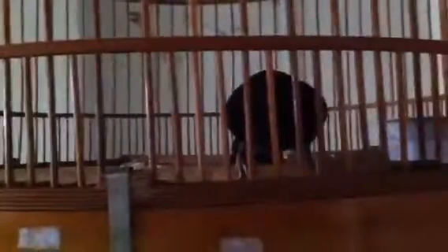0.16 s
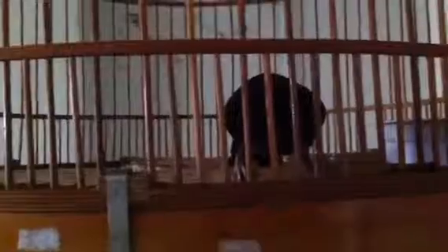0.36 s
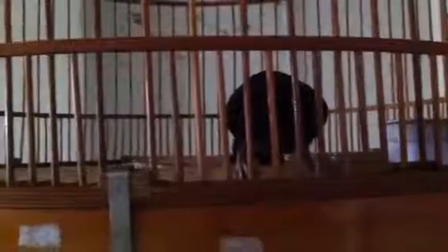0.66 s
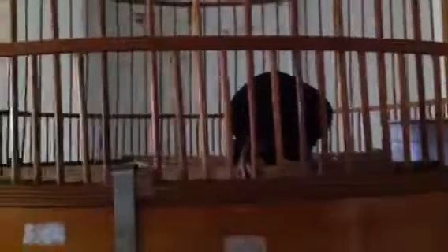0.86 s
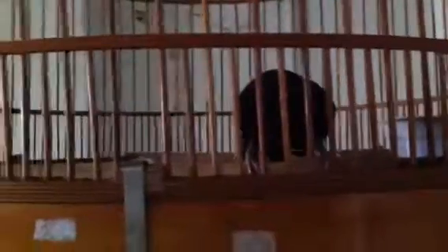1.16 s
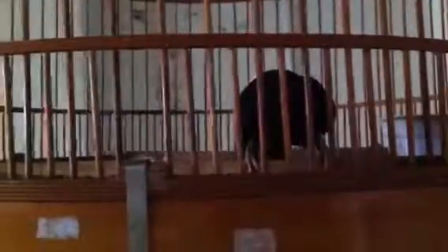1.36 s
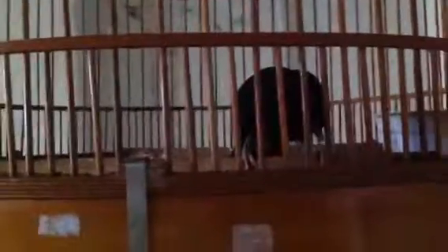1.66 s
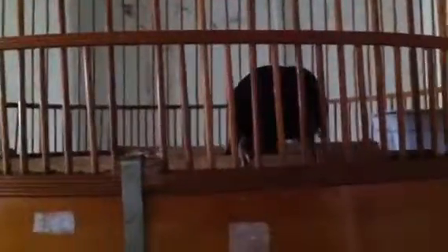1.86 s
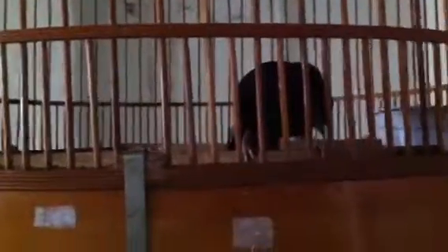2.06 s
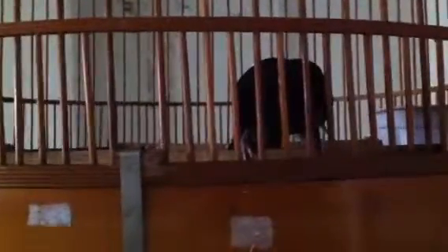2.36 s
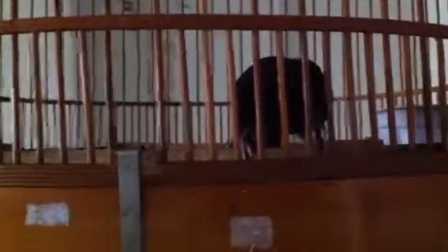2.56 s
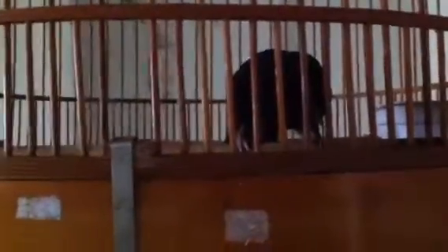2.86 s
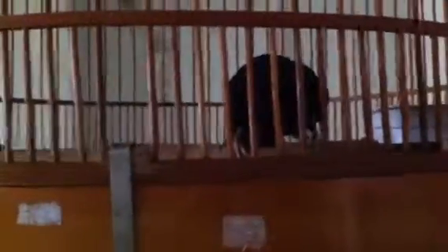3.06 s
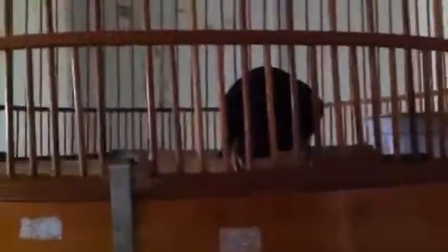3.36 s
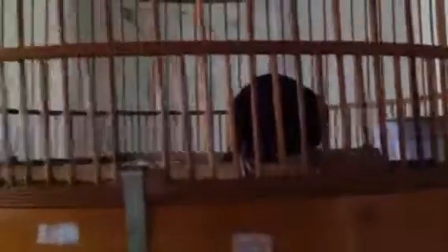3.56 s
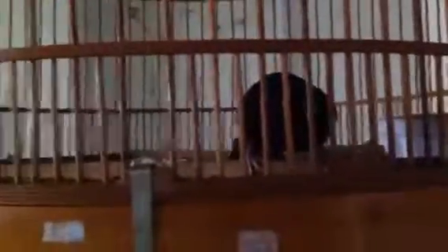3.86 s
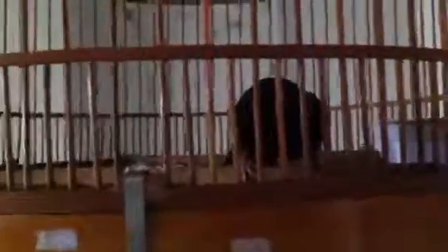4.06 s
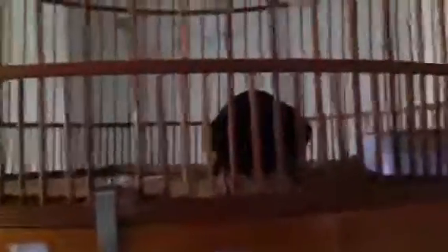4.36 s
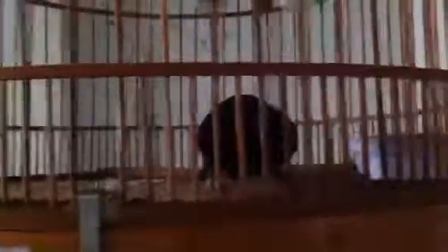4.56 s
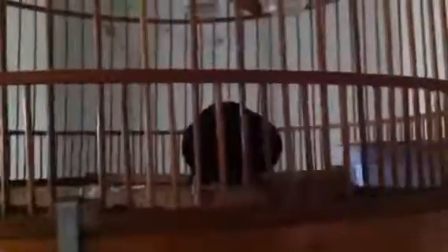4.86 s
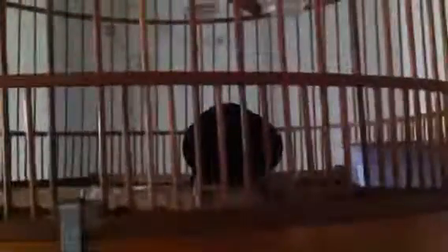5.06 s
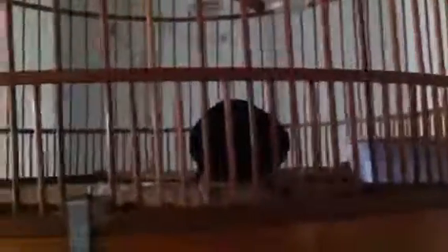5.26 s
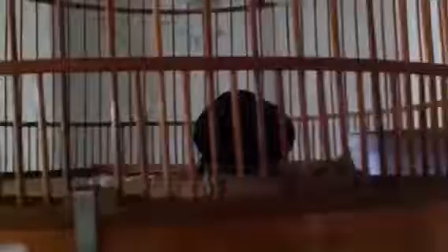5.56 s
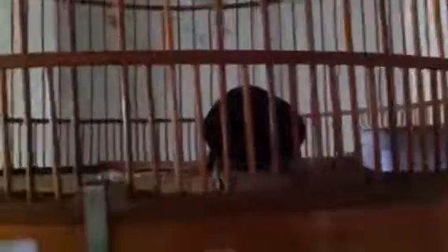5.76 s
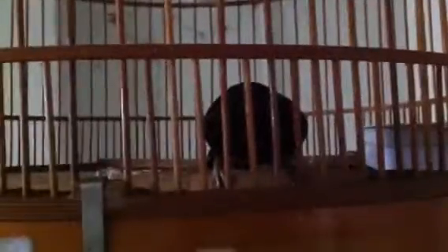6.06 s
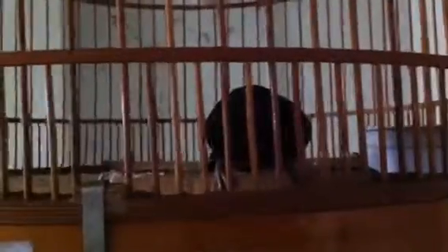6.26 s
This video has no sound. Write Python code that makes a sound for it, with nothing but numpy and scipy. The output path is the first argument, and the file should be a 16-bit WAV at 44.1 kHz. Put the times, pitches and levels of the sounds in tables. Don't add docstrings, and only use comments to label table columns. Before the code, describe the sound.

Near bird's rapid whistled song and piercing downward calls in an echoing room, with a distant bird's even whistles, brush strokes and faint motor hum.

```python
import sys
import numpy as np
from scipy import signal
from scipy.fft import rfft, irfft
from scipy.io import wavfile
from scipy.ndimage import uniform_filter1d

SR = 44100
rng = np.random.default_rng(int(sys.argv[2]) if len(sys.argv) > 2 else 0)


def makeup_ratio(level_db):
    decades = np.asarray(level_db, float) / 20
    return 10 ** decades


def bounce(signal):
    frames = np.transpose(np.atleast_2d(signal))
    limited = np.clip(frames, -1, 1)
    pcm = np.round(limited * 32767).astype(np.int16)
    wavfile.write(sys.argv[1], SR, pcm)


N = 282240
LEAD = SR // 5


def at_hz(points, hz):
    point_hz, point_db = np.transpose(points)
    return np.interp(np.log(hz), np.log(point_hz), point_db)


def coloured(x, spectrum):
    hz = np.maximum(np.arange(len(x) // 2 + 1) * SR / len(x), 1)
    y = irfft(rfft(x) * makeup_ratio(at_hz(spectrum, hz)), len(x))
    return y / np.std(y)


def drift(size, rate_hz):
    r = np.exp(-2 * np.pi * rate_hz / SR)
    noise = rng.standard_normal(size + 4000)
    slow = signal.lfilter([1], [1, -2 * r, r * r], noise)[4000:]
    return slow / np.std(slow)


def add(out, start_s, x):
    i = LEAD + round(start_s * SR)
    out[i:i + len(x)] += x[:len(out) - i]


def stroke(shape, s, length, from_hz, to_hz, db):
    return [(s + u * length, from_hz + way * (to_hz - from_hz), db + d) for u, way, d in shape]


# (frequency [Hz], time to fall 60 dB [s], level [dB])
ROOM_DECAY = [(513, 0.06, -11), (850, 0.48, 10), (1500, 0.49, 2.5), (3000, 0.34, 4), (6400, 0.4, 5.5),
              (11300, 0.32, 0.5)]


def echoes():
    gap_s = 0.0038
    t, tail = np.arange(SR) / SR, 0
    hz, t60, db = np.transpose(ROOM_DECAY)
    for low in 170 * 2 ** np.arange(0, 6.6, .5):
        half_octave = signal.butter(2, [low, low * np.sqrt(2)], "band", fs=SR, output="sos")
        band = signal.sosfilt(half_octave, rng.standard_normal(SR))
        middle = low * 2 ** .25
        life_s = np.interp(middle, hz, t60)
        tail = tail + band * makeup_ratio(np.interp(middle, hz, db) - 60 * t / life_s)
    tail = tail * np.clip(t / gap_s - 1, 0, 1)
    return tail / np.sqrt(np.sum(tail ** 2))


def room(x, tail):
    return signal.fftconvolve(x, tail)[:len(x)]


# (frequency [Hz], level [dB])
BREATH_COLOUR = [(3000, -19.5), (4000, -13), (8000, -5), (8900, -2), (12000, -7.5), (16000, -7.5)]
# (frequency [Hz], level [dB])
THROAT_COLOUR = [(1500, -6), (3000, 5.5), (5000, 7), (7000, 9.5), (9500, 5), (11000, -5.5), (13000, -2.5),
                 (16000, 0)]


def whistle(note, voice, rasp=.2, wobble=0., late_s=0., edge_s=.006, flutter_db=1.2,
            jitter=.003, jitter_hz=250, throat=THROAT_COLOUR, onset_db=0.):
    glide_db = -4
    wobble_hz, wobble_below_hz = 68, 4950
    full_effort_db, breath_db = -12.5, -31
    puff_db = -61
    onset_s = .014
    s, pitch_hz, level_db = np.transpose(note)
    t = np.arange(s[0], s[-1], 1 / SR)

    def soft(curve, size):
        return uniform_filter1d(np.interp(t, s, curve), size=size, mode="nearest")

    hz = soft(pitch_hz, size=130)
    speed = np.gradient(np.log2(hz)) * SR / 50
    flutter = flutter_db * drift(len(t), 140)
    gain = makeup_ratio(soft(level_db, size=480) + glide_db * speed ** 2 + flutter)
    shaking_s = np.maximum(t - t[np.argmax(hz < wobble_below_hz)], 0)
    hz = hz * (1 - wobble * np.sin(2 * np.pi * wobble_hz * shaking_s))
    phase = np.cumsum(2 * np.pi * hz * (1 + jitter * drift(len(t), jitter_hz)) / SR)

    second_db, fall_db, growth = voice
    effort = (gain / makeup_ratio(full_effort_db)) ** growth
    flare_db = onset_db * np.exp((s[0] + late_s - t) / onset_s).clip(0, 1)
    tone = np.sin(phase)
    for k in range(2, 12):
        share = rasp * np.minimum(k * hz / 10000, 1) ** 2
        rough = 1 - share + share * drift(len(t), 700)
        partial_db = second_db + fall_db * (k - 2) + at_hz(throat, k * hz) + flare_db * (k * hz > 8000)
        level = makeup_ratio(partial_db) * (k * hz < .45 * SR)
        tone += level * effort * rough * np.sin(k * phase)
    tone += makeup_ratio(breath_db) * effort * coloured(rng.standard_normal(len(t)), BREATH_COLOUR)
    tone += makeup_ratio(puff_db) * (1000 / hz) ** 4 * drift(len(t), 150)
    edge = np.clip(np.minimum(t - s[0], s[-1] - t) / edge_s, 0, 1)
    return tone * gain * np.sin(edge * np.pi / 2) ** 2


SONG_VOICE, SONG_RASP = (-31.5, -0.62, 0.27), .55
# (frequency [Hz], level [dB])
SONG_COLOUR = [(1500, -5), (3000, -2.5), (5000, 2), (7800, -5.5), (9000, 5.5), (11000, 4), (13500, 6.5),
               (16000, -1)]


def sung(note, leap_s=0.):
    return whistle(note, SONG_VOICE, rasp=SONG_RASP, throat=SONG_COLOUR, onset_db=8, flutter_db=1.9,
                   late_s=leap_s + 0.0039)


# (share of the length [0-1], share of the way between pitches [0-1], level [dB])
RISE_SHAPE = [(0, 0.317, 1.5), (.14, 0, -4), (.55, .7, 1.5), (1, 0.98, -3.5)]
# (time [s], length [s], from [Hz], to [Hz], level [dB])
RISE_NOTES = [
    (-.15, .035, 1850, 2282, -6),
    (-.04, 0.058, 1688, 2444, -13.5),
    (1.545, 0.049, 2221, 2844, -6.5),
    (2.291, 0.011, 2546, 3150, 2.5),
    (2.525, 0.021, 3046, 3177, -11.5),
    (2.69, 0.042, 1965, 2446, -18.5),
    (2.892, 0.045, 1850, 2463, -9.5),
    (3.005, 0.0285, 1687, 2240, -12),
]


def rises(out):
    for row in RISE_NOTES:
        add(out, row[0], sung(stroke(RISE_SHAPE, *row)))


# (share of the length [0-1], share of the way between pitches [0-1], level [dB])
PLUNGE_SHAPE = [(0, 0, -7.5), (.35, 0.42, 3), (.7, 0.93, -8.5), (1, 1, -5.5)]
# (time [s], length [s], from [Hz], to [Hz], level [dB])
PLUNGE_NOTES = [
    (-.1, 0.02, 3300, 2100, -13.5),
    (0.017, 0.035, 3332, 2190, -10.5),
    (1.344, .036, 1686, 2664, -8),
    (1.389, 0.018, 2532, 1850, -10.5),
    (2.541, .042, 3295, 1527, -7),
    (2.732, 0.019, 3250, 2446, -12),
    (2.954, 0.046, 3250, 1955, -12),
    (3.054, 0.054, 3180, 1994, -13),
]


def plunges(out):
    for row in PLUNGE_NOTES:
        add(out, row[0], sung(stroke(PLUNGE_SHAPE, *row)))


# (share of the length [0-1], share of the way between pitches [0-1], level [dB])
DIP_SHAPE = [(0, 0.064, 9), (.35, 0.65, -9.5), (.6, 0.93, 0.5), (1, 0.594, -11)]
# (time [s], length [s], from [Hz], to [Hz], level [dB])
DIP_NOTES = [
    (0.047, 0.037, 1962, 1477, -10.5),
    (2.585, 0.019, 1500, 1359, -13),
    (2.669, .028, 1790, 1352, -13.5),
    (2.761, 0.034, 1840, 1500, -13.5),
    (2.946, 0.01, 3000, 3250, -9),
    (2.99, 0.032, 1683, 1616, -10),
    (3.026, 0.028, 2204, 2082, -15.5),
    (3.091, 0.032, 1855, 1515, -10.5),
]


def dips(out):
    for row in DIP_NOTES:
        add(out, row[0], sung(stroke(DIP_SHAPE, *row)))


# (share of the length [0-1], share of the way [0-1], level [dB])
DEEP_SHAPE = [(0, 0.091, -6), (.3, .25, 6), (.6, .62, -20.5), (1, 0.9, -13.5)]
# (time [s], length [s], from [Hz], level [dB], landing level [dB])
DEEP_NOTES = [
    (1.583, 0.029, 2802, -9.5, -16.5),
    (1.803, 0.032, 3550, -8, -19.5),
    (2.059, 0.035, 3576, -9.5, -21),
    (2.302, 0.033, 3202, -9.5, -19),
]
BOTTOM_HZ = 1207.3


def deep_plunges(out):
    for s, length, hz, db, _ in DEEP_NOTES:
        add(out, s, sung(stroke(DEEP_SHAPE, s, length, hz, BOTTOM_HZ, db)))


# (time [s], length [s], from [Hz], to [Hz], level [dB])
SWOOP_NOTES = [
    (1.759, 0.053, 2276, 2674, -7),
    (1.992, 0.075, 2368, 2695, -6.5),
    (2.254, .043, 2292, 2643, -8),
    (2.48, 0.055, 2090, 2615, -7.5),
]


def swoops(out):
    leap_s, leap_from_hz, leap_db = .016, 860, -27
    for row in SWOOP_NOTES:
        s, _, from_hz, _, db = row
        leap = [(s - leap_s, leap_from_hz, db + leap_db), (s - .003, from_hz, db + leap_db)]
        add(out, s - leap_s, sung(leap + stroke(RISE_SHAPE, *row), leap_s))


# (end time [s], top pitch [Hz], level [dB])
HOARSE_CLIMBS = [
    (1.81, 3600, -22.5),
    (2.06, 3700, -19),
    (2.31, 3400, -20),
    (2.55, 3450, -24),
    (2.738, 3300, -29),
    (2.897, 2900, -29.5),
    (.02, 3500, -27),
]


def hoarse_climbs(out):
    length_s, from_share, swell_db = .027, 0.74, -8
    for s, hz, db in HOARSE_CLIMBS:
        climb = [(s - length_s, from_share * hz, db + swell_db), (s, hz, db)]
        add(out, s - length_s, whistle(climb, SONG_VOICE, throat=SONG_COLOUR, rasp=SONG_RASP, flutter_db=8.5,
                                       jitter=.06, jitter_hz=600))


# (share of the length [0-1], share of the way between pitches [0-1], level [dB])
BUBBLE_SHAPE = [(0, 0, -12.5), (.5, .9, 3), (.75, 1, -3.5), (1, 0.74, -18.5)]
# (share of the length [0-1], share of the way [0-1], level [dB])
LANDING_SHAPE = [(0, 0.013, -4), (.35, .8, -6.5), (.7, 1, -0.5), (1, 0.64, 0)]
# (time [s], length [s], pitch [Hz], level [dB])
BUBBLE_NOTES = [
    (1.106, 0.068, 964, -22),
    (1.165, .042, 1250, -16.5),
    (1.217, 0.042, 1003, -16.5),
    (1.283, 0.035, 920.5, -17),
    (1.395, 0.042, 801, -27.5),
    (1.491, 0.052, 850, -26),
    (1.715, 0.037, 937.6, -20.5),
    (1.945, 0.031, 918, -23),
    (2.209, 0.036, 908, -25.5),
    (2.44, 0.044, 1005, -25),
]


def bubbles(out):
    scoop = .85
    landing_hz, landing_s = 850, .026
    notes = [stroke(BUBBLE_SHAPE, s, length, scoop * hz, hz, db) for s, length, hz, db in BUBBLE_NOTES]
    for s, length, _, _, db in DEEP_NOTES:
        notes.append(stroke(LANDING_SHAPE, s + length - .003, landing_s, BOTTOM_HZ, landing_hz, db))
    for note in notes:
        add(out, note[0][0], whistle(note, (-41, 0., .4), rasp=SONG_RASP, flutter_db=2.2, jitter=.01))


# (pitch [Hz], level [dB])
BEAK_RESONANCE = [(3200, -23.5), (4200, -13), (5200, -0.5), (5900, -9), (6700, -26.5)]


def falling_call(s, length, top_hz, db, held):
    end_hz, droop = 3250, 1.2
    flick, flick_s = .05, .009
    u = np.linspace(0, 1, 30)
    hz = top_hz - (top_hz - end_hz) * (np.maximum(u - held, 0) / (1 - held)) ** droop
    hz = hz * (1 - flick * np.maximum(1 - u * length / flick_s, 0))
    return np.transpose([s + u * length, hz, db + at_hz(BEAK_RESONANCE, hz)])


# (time [s], length [s], top pitch [Hz], level [dB], held share [0-1])
CALLS = [
    (3.806, 0.11, 6600, -22, .15),
    (4.368, 0.15, 6720, -12, 0.04),
    (4.753, 0.15, 6650, -9, 0.12),
    (5.132, 0.17, 6380, -11.5, 0.16),
    (5.555, .156, 6203, -13.5, 0.1),
    (6.139, 0.13, 6430, -18, 0),
]
CALL_SHAKES = [.002, .045, .035, .048, .024, .004]
# (pitch [Hz], level [dB])
UNDER_NOTES = [
    (3700, -49),
    (3590, -35.5),
    (3500, -39.5),
    (3550, -39),
    (3700, -39.5),
    (3730, -41),
]


def high_calls(out):
    lag_s, under_s, swell_db, lift = .012, 0.075, -12, 0.054
    for row, (hz, db), shake in zip(CALLS, UNDER_NOTES, CALL_SHAKES):
        s = row[0] + lag_s
        under = [(s, hz, db + swell_db), (s + 0.606 * under_s, hz, db), (s + under_s, hz * (1 + lift), db)]
        add(out, s, whistle(under, (-5, -14, .1), flutter_db=3.5, jitter=.01))
        add(out, row[0], whistle(falling_call(*row), (-8.5, 0, 0.39), wobble=shake, edge_s=.005))


def caged_bird(tail):
    out = np.zeros(N + LEAD)
    for part in (rises, plunges, hoarse_climbs, dips, bubbles, deep_plunges, swoops, high_calls):
        part(out)
    return out + makeup_ratio(-7) * room(out, tail)


# (frequency [Hz], level [dB per Hz])
AIR_COLOUR = [(15, -34.5), (30, -21), (90, -45), (140, -15.5), (300, -16), (660, -22), (1300, -21.5),
              (2500, -18.5), (4000, -25.5), (8000, -27.5), (16000, -34)]


def room_tone():
    return makeup_ratio(-64.5 + 0.27 * drift(N, 6)) * coloured(rng.standard_normal(N), AIR_COLOUR)


# (frequency [Hz], level [dB rms])
MOTOR_LINES = [(140.0, -84), (247.6, -77), (296.1, -77), (344.5, -77.5), (393.0, -81)]


def motor():
    t = np.arange(N) / SR
    return sum(makeup_ratio(db + 2 + 2.3 * drift(N, 4.3)) * np.sin(2 * np.pi * hz * t) for hz, db in MOTOR_LINES)


# (time [s], length [s], from [Hz], to [Hz], level [dB])
LEAD_INS = [
    (.11, 0.18, 924, 1000, -49.5),
    (0.273, 0.0244, 980, 940, -56),
    (3.676, 0.087, 1090, 860, -50.5),
    (3.743, 0.1, 1253, 1500, -52),
]
# (time [s], pitch [Hz], length [s])
FIRST_DASHES = [(0.283, 1921, 0.059), (0.375, 2015, 0.079), (0.463, 2100, 0.067), (0.573, 2114, 0.07),
                (0.667, 2100, 0.084), (.792, 2140, 0.074), (0.887, 2110, 0.08), (0.991, 2120, 0.084),
                (1.099, 2154, .085), (1.2, 2151, 0.032), (1.248, 2135, 0.058), (1.311, 2140, 0.033),
                (1.41, 2130, 0.038), (1.495, 2110, 0.045)]
# (time [s], level [dB], pitch [Hz], length [s])
LATER_DASHES = [(3.8322, -41.5, 1864, 0.084), (3.936, -37, 1954, 0.091), (4.0262, -36, 2030, 0.16),
                (4.147, -39, 2080, 0.15), (4.2517, -37.5, 2067, 0.13), (4.36, -38, 2077, 0.17),
                (4.4608, -39.5, 2052, 0.24), (4.5594, -36, 2010, 0.086), (4.6683, -39, 2062, 0.102),
                (4.794, -30.5, 2137, 0.046), (4.8858, -50.5, 2076, 0.11), (4.9694, -55, 2146, 0.071)]


def far_whistles():
    voice, held = (-60, -6, 1.5), np.zeros(N + LEAD)
    swelling = [(s, -38 + 7 * s, hz, length) for s, hz, length in FIRST_DASHES]
    for s, db, hz, length in swelling + LATER_DASHES:
        dash = [(s, hz, db - 5.0), (s + max(length, .02), hz * 1.012, db - 2.5)]
        add(held, s, whistle(dash, voice, edge_s=.013, flutter_db=1.3))
    for s, length, from_hz, to_hz, db in LEAD_INS:
        glide = [(s, from_hz, db), (s + length, to_hz, db - 16.0)]
        add(held, s, whistle(glide, voice, edge_s=0.0076))
    return held


# (start [s], end [s], level [dB])
TRILLS = [
    (0.147, 1.315, -48.5),
    (3.752, 4.885, -50.5),
]


def far_trill():
    flicks_per_s, low_hz, high_hz = 33, 1272, 1850
    swell_s, swell_db = 0.092, -6
    roll = np.zeros(N + LEAD)
    for start, end, db in TRILLS:
        t = np.arange(start, end, 1 / SR)
        fade_db = swell_db * np.maximum(1 - np.minimum(t - start, end - t) / swell_s, 0)
        flick = np.cumsum(flicks_per_s * (1 + .1 * drift(len(t), 12)) / SR) % 1
        hz = low_hz + (high_hz - low_hz) * flick
        tone = np.sin(np.cumsum(2 * np.pi * hz / SR))
        add(roll, start, makeup_ratio(db + fade_db + 4.0) * np.sin(np.pi * flick) * tone)
    return roll


def far_bird(tail):
    held, roll = far_whistles(), far_trill()
    return held + makeup_ratio(-9) * roll + room(makeup_ratio(-8) * held + roll, tail)


# (frequency [Hz], level [dB])
BRISTLE_COLOUR = [(900, -41.5), (1500, -6.5), (2500, -5), (4000, -5), (6000, -5.5), (8000, -10.5),
                  (11000, -18.5), (16000, -18)]
# (time [s], level [dB], length [s], low scrape level [dB])
BRUSH_STROKES = [(0.568, -53.5, 0.076, -21), (0.782, -54, 0.095, -19), (1.047, -51.5, 0.078, -14),
                 (3.17, -51.5, 0.033, -81), (3.347, -55.5, 0.1, -23.5), (3.587, -51, 0.079, -22.5),
                 (3.767, -53, 0.21, -14.5), (4.006, -51, 0.13, -14.5), (4.293, -55, 0.19, -11.5),
                 (4.581, -51.5, 0.094, -23), (5.141, -52, 0.11, -15.5), (5.494, -50.5, 0.16, -15.5),
                 (5.717, -48.5, 0.17, -14), (6.104, -50, 0.13, -15)]


def brush(tail):
    size = N + LEAD
    strength = makeup_ratio(1.2 * np.minimum(rng.exponential(1, size), 4))
    slips = strength * rng.choice([-1, 1], size) * (rng.random(size) < .15)
    bright = coloured(slips, BRISTLE_COLOUR)
    dull = coloured(slips, [(350, -44), (550, 2.5), (800, -4), (1300, -5), (2200, -34.5)])
    t, out = (np.arange(size) - LEAD) / SR, 0
    for s, db, length, low_db in BRUSH_STROKES:
        rise = np.clip((t - s) / .014, 0, 1)
        pressure = rise * np.exp(-(np.maximum(t - s, 0) / length) ** 1.8)
        out = out + makeup_ratio(db) * pressure * (bright + makeup_ratio(low_db) * dull)
    return out + makeup_ratio(4) * room(out, tail)


def scene():
    sources = caged_bird(echoes()) + far_bird(echoes()) + brush(echoes())
    fade_in = np.minimum(np.arange(N) / SR / .004, 1)
    return (sources[LEAD:] * fade_in + room_tone() + motor())[None]


def roll_off(x):
    return signal.sosfilt(signal.butter(12, 16430, fs=SR, output="sos"), x)


def record(dry):
    squash = 1.1 * np.tanh(dry / 1.1) - dry
    bent = dry + signal.sosfilt(signal.butter(2, 500, "high", fs=SR, output="sos"), squash)
    bent = signal.sosfilt(signal.butter(2, 40, "high", fs=SR, output="sos"), bent)
    mix = signal.sosfilt(signal.cheby2(14, 60, 16400, fs=SR, output="sos"), bent)
    return roll_off(mix)


dry = scene()
out = record(dry)
bounce(out)
```